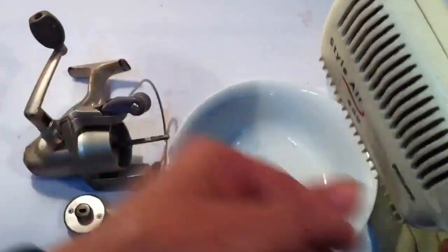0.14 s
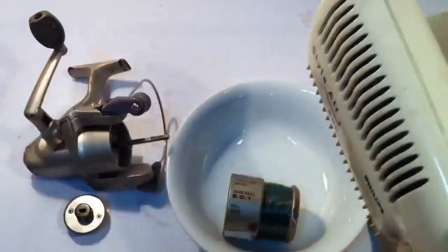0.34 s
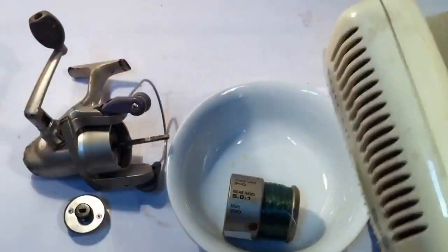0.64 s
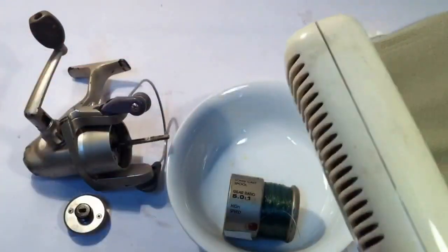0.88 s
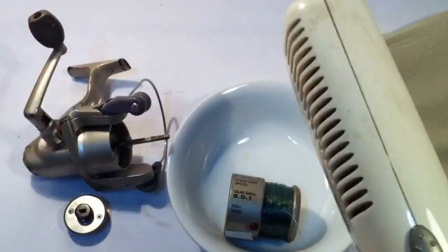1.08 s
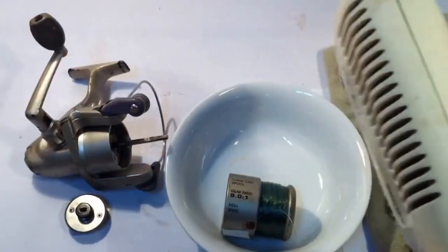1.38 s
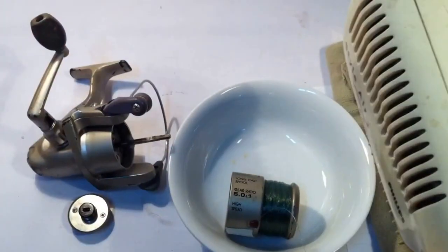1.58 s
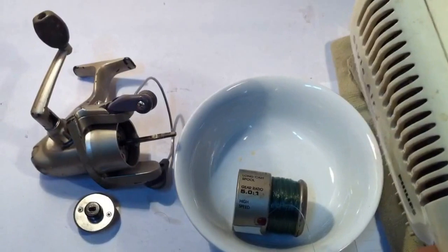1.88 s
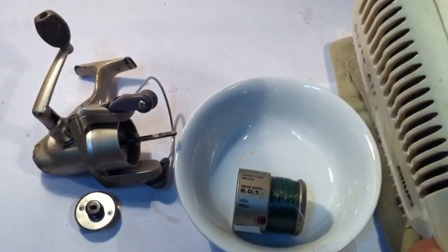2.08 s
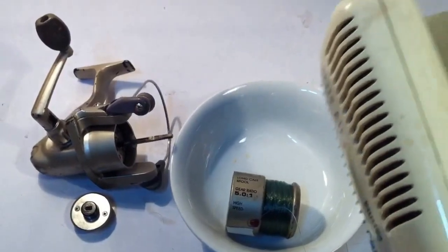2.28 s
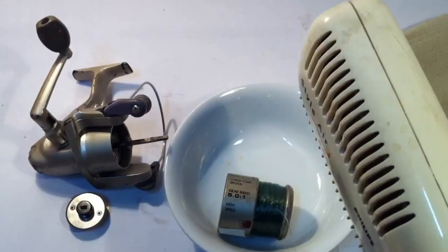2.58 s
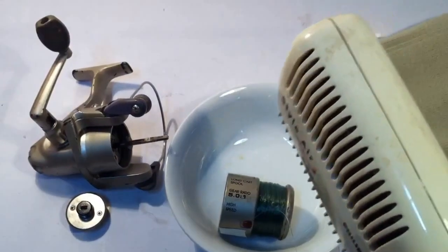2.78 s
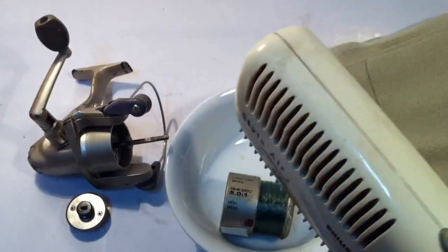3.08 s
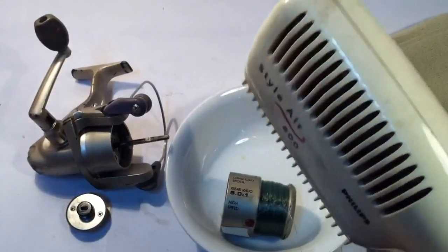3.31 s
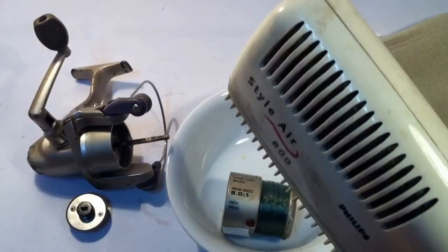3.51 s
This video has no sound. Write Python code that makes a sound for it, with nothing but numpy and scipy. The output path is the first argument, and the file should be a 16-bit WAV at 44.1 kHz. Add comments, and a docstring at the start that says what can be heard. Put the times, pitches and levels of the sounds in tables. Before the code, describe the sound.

A handheld hair dryer clicks on and spins up to a rushing, whining blast after handling clunks

```python
"""In a small room, a hand-held hair dryer is picked up over a table, close to the microphone.
Over faint hiss and a low drone its plastic case ticks, rubs and gives one loud clunk: noise snaps plus dying sines.
The switch clicks and the motor spins up: brush hiss, shaft hum and blade whine (sines) and rushing air
(shaped noise through resonances) all follow its speed, while the dryer is turned and brought nearer."""
import sys
import numpy as np
from scipy import signal
from scipy.fft import rfft, irfft
from scipy.io import wavfile

SR = 44100
rng = np.random.default_rng(int(sys.argv[2]) if len(sys.argv) > 2 else 0)


def dump(signal):
    """Clip the signal to [-1, 1] and save it as 16-bit WAV at the path in sys.argv[1]."""
    limited = np.clip(np.atleast_2d(signal).T, -1, 1)
    pcm = np.round(limited * 32767).astype(np.int16)
    wavfile.write(sys.argv[1], SR, pcm)


N = 160965

# Colour of the background hiss. Each row: frequency in Hz, relative level in dB per Hz.
FLOOR_COLOUR = [(18, -69), (30, -47), (85, -33), (97, -18), (152, -8), (342, -21), (422, -18.5), (507, -23),
                (694, -25), (950, -24.5), (1110, -25.5), (1300, -27), (1880, -28), (15600, -33.5)]
FLOOR_DB = -63.5
# Swells of the low drone. Each row: time in seconds, rms level in dB.
DRONE_LEVEL = [(.06, -59.5), (.18, -79), (.33, -68), (.41, -71), (.5, -57.5), (.65, -70), (.85, -62.5),
               (1.15, -70), (1.3, -69), (1.39, -58), (1.7, -67), (1.87, -61), (2.0, -69)]
DRONE_HZ, DRONE_WANDER = 144.6, 0.0847  # wander: rms share of the pitch

# Decay of the room. Each row: frequency in Hz, t60 in seconds.
ROOM_DECAY = [(150, 0.35), (600, 0.43), (2000, 0.49), (6000, 0.53), (14000, 0.27)]
# Colour of the room's answer. Each row: frequency in Hz, level in dB.
ROOM_COLOUR = [(150, 3), (400, 1), (1200, -1.5), (3500, 2), (8000, 3), (15000, -6.5)]
ROOM_DELAY_S = .014
TICK_ROOM_DB, CLUNK_ROOM_DB, THUMP_ROOM_DB, TONE_ROOM_DB = -10.5, -11.5, -16, -15

# Ticks of the case, the last two from the switch. Each row: start in seconds, gain in dB, extra treble in dB.
TICKS = [(.224, -7.5, -25), (.578, -13.5, 3), (.606, -14, 3.5), (.676, -18, 12.5), (.734, -14.5, 4),
         (.797, -7.5, -4.5), (.875, -19, 3), (.9165, 3.5, -3), (.921, -1, -4), (.939, -9, -8),
         (.951, -2, -8), (.963, -15, -3), (1.064, -9, -1.5), (1.953, -7.5, -2), (1.958, -10.5, -4)]
# What the case rings with. Each row: frequency in Hz, level in dB before the tick's gain, t60 in seconds.
CASE_MODES = [(739, -50.5, 0.082), (820, -58, .05), (1570, -55, .036), (1775, -52, 0.042),
              (2110, -69, .034), (3040, -50, .03)]
# Colour of a tick's snap. Each row: frequency in Hz, relative level in dB per Hz.
SNAP_COLOUR = [(200, -12.5), (1000, -5), (2000, 1.5), (6000, -0.5), (10000, -10), (15000, -12)]
SNAP_DB, SNAP_T60_S = -42, .018
KNOCK_TREBLE_HZ = 1170  # the extra treble of ticks and clunk lies above this

# The hand sliding on the case. Each row: start in seconds, length in seconds, gain in dB at the peak.
RUBS = [(0.549, 0.66, -73), (0.721, 0.36, -73), (.915, 0.074, -66), (1.079, 0.21, -67)]
# Colour of the rubbing. Each row: frequency in Hz, relative level in dB per Hz.
RUB_COLOUR = [(150, -4), (400, 2), (1000, -2), (2500, 0.5), (5000, -6.5), (15000, -9)]
# Resonances the rubbing wakes. Each row: frequency in Hz, width in Hz, gain in dB.
RUB_RINGS = [(413, 52, 5.2), (687, 31, 5.6), (1250, 90, 3.2), (1770, 110, 7), (3100, 140, 3)]
RUB_FLUTTER_DB = 2.4

# Soft knocks of the hand on the handle. Each row: start in seconds, level in dB, extra treble in dB,
# t60 in seconds.
BUMPS = [(.785, -57.5, 2, 0.26), (1.786, -54, -1, 0.16), (1.85, -64, 6, .15), (1.905, -55.5, 6, 0.18),
         (1.995, -63, 11, .12), (2.024, -65, 14, .12), (2.112, -48.5, 10, 0.12), (2.165, -41, 10, .1),
         (2.2, -34, 0, .08)]
# Colour of the soft knocks. Each row: frequency in Hz, relative level in dB per Hz.
BUMP_COLOUR = [(60, -13), (170, 2), (300, -0.5), (700, -15.5), (1200, -14), (3000, -42), (12000, -50.5)]
BUMP_RISE_S, BUMP_TREBLE_HZ = 0.0062, 600

# Blows of the clunk and the clatter after it. Each row: start in seconds, gain in dB, extra treble in dB.
CLUNK_BLOWS = [(1.4705, -27, 4), (1.4738, -3, -2), (1.475, -3, -1.5), (1.477, -2, 0.5), (1.4803, -4, -4),
               (1.4854, -10, -6), (1.4963, -11.5, -2), (1.510, -17, -4), (1.521, -19, -3),
               (1.5252, -14, -14), (1.540, -17.5, -10), (1.554, -24, -16), (1.567, -32, 8),
               (1.572, -29.5, 10.5)]
# What the clunk rings with. Each row: frequency in Hz, level in dB before the blow's gain, t60 in seconds.
CLUNK_MODES = [(574, -37, .04), (1150, -37, 0.025), (2220, -46, 0.027), (3700, -52, .018)]
# Colour of each blow's crack. Each row: frequency in Hz, relative level in dB per Hz.
CRACK_COLOUR = [(100, -13), (280, 2.5), (480, -2), (620, -1), (800, -7.5), (1120, -1), (1400, -13.5),
                (2200, -9), (2600, -16.5), (3700, -18), (5500, -27), (8500, -27), (15000, -40)]
CRACK_DB, CRACK_T60_S = -19.5, .028
# Low rings of the hollow body. Each row: frequency in Hz, level in dB, t60 in seconds.
THUMP_MODES = [(175, -15.5, 0.069), (251, -18.5, 0.043), (312, -23.5, 0.033), (402, -30, 0.041)]
THUMP_S = 1.4772

# Motor and fan; the stall speed is a share of full speed.
START_S, SPIN_UP_S, TOP_REV_PER_S = 1.98, .188, 185.85
SPEED_WAVER = .0007  # rms share of the speed
STALL_SHARE, STALL_SOFTNESS = 0.29, 0.033

# Hiss of the motor's brushes. Each row: frequency in Hz, relative level in dB per Hz.
BRUSH_COLOUR = [(200, -22), (700, 6), (1500, 2), (3000, -1), (6000, 3), (10000, 2), (15000, -8)]
BRUSH_DB, BRUSH_GROWTH, BRUSH_FLUTTER_DB = -54.5, 0.56, 1.5  # growth: exponent on speed
DUCT_HZ, DUCT_WIDTH_HZ = 720, 45
BRUSH_DUCT_DB, DUCT_AIR_DB = 17, -14

# Tones of the shaft. Each entry: multiple of the shaft speed, base level in dB.
SHAFT_TONES = {1: -48.5, 2: -54, 4: -59.5, 5: -57, 6: -63, 7: -66, 13: -52.5}
# Swells of the duct's ringing with the shaft hum. Each row: time in seconds, gain in dB.
DUCT_SONG = [(2.21, 6), (2.27, 23), (2.34, 9), (2.46, 9), (2.53, 20), (2.61, 14), (2.72, 18), (3.0, 17.5),
             (3.26, 16), (3.33, 13), (3.43, 18), (3.65, 16)]
# Tones of the fan blades: base levels in dB of the blade tone and its overtones, in order.
BLADE_TONES_DB = [-36.3, -61, -48]
# Swells and dips of the whine. Each row: time in seconds, gain in dB of the blade tone,
# gain in dB of its overtones.
WHINE = [(2.09, -5, -9), (2.14, -6, -3), (2.19, 0, 1), (2.25, -5, 2), (2.31, 2, 2), (2.39, -8, -7),
         (2.5, 0, 0), (2.62, -3, -5), (2.72, -1, 3), (2.84, 0, 3), (2.91, -4, -6), (3.05, -3, -4),
         (3.12, 1, -1), (3.2, 0, 3), (3.38, -.5, -1), (3.5, 4, 1), (3.65, 0, -5)]
BLADES, BLADE_ROUGH_RAD = 20, 0.2
TONE_GROWTH, BLADE_GROWTH = 1.6, 1.4  # exponents on the air flow
TONE_FLUTTER_DB, BLADE_FLUTTER_DB = 1.5, 1.9

# Rush of air at full speed. Each row: frequency in Hz, relative level in dB per Hz.
AIR_COLOUR = [(18, -48), (30, -37), (85, -40), (148, -17), (178, -9.5), (219, -8.5), (316, -8.5), (370, -7),
              (469, -16), (507, -10.5), (676, -5), (731, -4.5), (791, -5), (1030, -8.5), (1200, -7.5),
              (1300, -7.5), (1780, -5.5), (1980, -8.5), (2500, -5.5), (3420, -5), (3700, -5.5),
              (4010, -6.5), (9020, -9.5), (13700, -15.5), (15600, -19)]
AIR_DB, AIR_FLUTTER_DB, STALL_FLUTTER_DB = -28.5, .5, 3
# How steeply the rush grows with the flow. Each row: frequency in Hz, exponent on the flow.
AIR_GROWTH = [(150, 1.8), (700, 1.25), (2000, 1.45), (5000, 1.88), (14000, 2.85)]
# The dryer is turned and brought nearer. Each row: time in seconds, gain in dB, extra treble in dB.
AIM = [(2.1, -1, -1), (2.3, -1, -1), (2.42, -1.5, 0.5), (2.75, 0, -2), (3.0, -0.15, -1), (3.3, -0.5, 0),
       (3.55, 0.5, -1), (3.65, -0.5, 1)]
AIM_TREBLE_HZ = 4000
# Resonances of the case that colour the rush. Each row: frequency in Hz, width in Hz, gain in dB.
CAVITIES = [(1225, 35, -1.5), (1378, 41, 0), (1597, 46, -9), (1790, 81, -4), (2082, 50, -8),
            (2530, 130, -5), (3105, 60, -7.5), (6070, 380, -12), (9030, 300, -10)]
CAVITY_WANDER, CAVITY_FLUTTER_DB = .012, 3.5  # wander: rms share of the frequency

BASS_CUT_HZ, BASS_LEAK_DB = 158, -27
CUTOFF_HZ = 15780


def amp(db):
    """Decibels to gain."""
    return 10 ** (np.asarray(db) / 20)


def unit(x):
    """Scales to rms 1."""
    return x / np.sqrt(np.mean(x ** 2) + 1e-20)


def at_hz(points, hz):
    """Reads a table on a log-frequency axis."""
    f, value = np.transpose(points)
    return np.interp(np.log(hz + 1), np.log(f + 1), value)


def at_time(points, t, axis=1):
    """Reads one column of a curve over time."""
    rows = np.array(points)
    return np.interp(t, rows[:, 0], rows[:, axis])


def add(mix, s, sound):
    """Mixes a sound in at time s."""
    part = mix[round(s * SR):][:len(sound)]
    part += sound[:len(part)]


def noise(colour, size):
    """Noise of a given colour, random in phase, rms 1."""
    hz = np.fft.rfftfreq(size, 1 / SR)
    phase = 2 * np.pi * rng.random(len(hz))
    return unit(irfft(amp(at_hz(colour, hz)) * np.exp(1j * phase), size))


def drift(rate_hz):
    """Random motion that weakens above a rate, rms 1."""
    hz = np.fft.rfftfreq(N, 1 / SR)
    spectrum = rfft(rng.standard_normal(N)) * (hz > 0)
    return unit(irfft(spectrum / (1 + (hz / rate_hz) ** 2), N))


def resonate(x, hz, width_hz):
    """A resonance of gain 1 whose centre may move: shift it to zero, smooth, shift back."""
    turn = np.exp(2j * np.pi * np.cumsum(hz * np.ones(len(x))) / SR)
    r = np.exp(-np.pi * width_hz / SR)
    smooth = signal.lfilter([1 - r], [1, -r], x / turn + 1e-18)
    return 2 * (turn * smooth).real


def ring(modes, t):
    """Dying sines of a struck object."""
    return sum(amp(db - 60 * t / t60) * np.sin(2 * np.pi * hz * t) for hz, db, t60 in modes)


def brighten(x, treble_db, edge_hz):
    """Raises or lowers everything above an edge."""
    low = signal.lfilter(*signal.butter(3, edge_hz, "low", fs=SR), x)
    high = signal.lfilter(*signal.butter(3, edge_hz, "high", fs=SR), x)
    return low + amp(treble_db) * high


def in_room(x, wet_db):
    """Adds a diffuse tail whose bands die at their own speeds."""
    hz, t, z = signal.stft(rng.standard_normal(SR * 3 // 4), SR, nperseg=256)
    hz = hz[:, None]
    level_db = at_hz(ROOM_COLOUR, hz) - 60 * t / at_hz(ROOM_DECAY, hz)
    tail = signal.istft(z * amp(level_db), SR, nperseg=256)[1]
    tail = np.pad(tail / np.linalg.norm(tail), (round(ROOM_DELAY_S * SR), 0))
    return x + amp(wet_db) * signal.fftconvolve(x, tail)[:N]


def background():
    """Faint steady hiss and a low sine drone that wavers in pitch and level."""
    angle = 2 * np.pi * np.cumsum(DRONE_HZ * (1 + DRONE_WANDER * drift(24.9))) / SR
    drone = np.sqrt(2) * np.sin(angle) * amp(at_time(DRONE_LEVEL, np.arange(N) / SR))
    return amp(FLOOR_DB) * noise(FLOOR_COLOUR, N) + drone


def ticks():
    """Case and switch ticks: a short noise snap sets the plastic ringing."""
    out, t = np.zeros(N), np.arange(SR // 5) / SR
    for s, db, treble_db in TICKS:
        snap = noise(SNAP_COLOUR, len(t)) * amp(SNAP_DB - 60 * t / SNAP_T60_S)
        add(out, s, amp(db) * brighten(snap + ring(CASE_MODES, t), treble_db, KNOCK_TREBLE_HZ))
    return out


def rubs():
    """The sliding hand: fluttering noise wakes resonances as its pressure rises and falls."""
    scrape = noise(RUB_COLOUR, N) * amp(RUB_FLUTTER_DB * drift(60))
    scrape = scrape + sum(amp(db) * resonate(scrape, hz, width) for hz, width, db in RUB_RINGS)
    pressure = np.zeros(N)
    for s, length, db in RUBS:
        add(pressure, s, amp(db) * np.hanning(round(length * SR)))
    return pressure * scrape


def bumps():
    """The hand knocks the handle softly: dull noise with a rounded onset dies away."""
    out, t = np.zeros(N), np.arange(SR // 5) / SR
    for s, db, treble_db, t60 in BUMPS:
        onset = np.minimum(t / BUMP_RISE_S, 1)
        knock = noise(BUMP_COLOUR, len(t)) * onset * amp(db - 60 * t / t60)
        add(out, s, brighten(knock, treble_db, BUMP_TREBLE_HZ))
    return out


def handling():
    """The plastic case ticks, rubs and bumps in the hand, answered by the room."""
    return in_room(ticks() + rubs() + bumps(), TICK_ROOM_DB)


def clunk():
    """Quick hard blows, each a crack and a short ring, over one low thump; then it clatters to rest."""
    blows, t = np.zeros(N), np.arange(SR // 4) / SR
    for s, db, treble_db in CLUNK_BLOWS:
        crack = noise(CRACK_COLOUR, len(t)) * amp(CRACK_DB - 60 * t / CRACK_T60_S)
        add(blows, s, amp(db) * brighten(crack + ring(CLUNK_MODES, t), treble_db, KNOCK_TREBLE_HZ))
    thump = np.zeros(N)
    add(thump, THUMP_S, ring(THUMP_MODES, t))
    return in_room(blows, CLUNK_ROOM_DB) + in_room(thump, THUMP_ROOM_DB)


def speed(t):
    """Share of full speed: the motor closes in on it exponentially."""
    return 1 - np.exp(-np.maximum(t - START_S, 1e-6) / SPIN_UP_S)


def flow(t):
    """Share of the full air flow: it sets in softly once the fan is past its stall speed."""
    past_stall = (speed(t) - STALL_SHARE) / STALL_SOFTNESS
    return STALL_SOFTNESS * np.logaddexp(0, past_stall) / (1 - STALL_SHARE)


def brushes():
    """The brushes scrape and ring the duct as soon as the shaft turns, before the air gets going."""
    scrape = noise(BRUSH_COLOUR, N) * amp(BRUSH_DB + BRUSH_FLUTTER_DB * drift(80))
    scrape = scrape * speed(np.arange(N) / SR) ** BRUSH_GROWTH
    return scrape + amp(BRUSH_DUCT_DB) * resonate(scrape, DUCT_HZ, DUCT_WIDTH_HZ)


def rotor():
    """Shaft tones flare as they sweep through the duct resonance; the blades whine above them."""
    t = np.arange(N) / SR
    rev_per_s = TOP_REV_PER_S * speed(t) * (1 + SPEED_WAVER * drift(7.7))
    angle = 2 * np.pi * np.cumsum(rev_per_s) / SR
    hum = np.zeros(N)
    for k, db in SHAFT_TONES.items():
        phase = 2 * np.pi * rng.random()
        hum += amp(db + TONE_FLUTTER_DB * drift(29)) * np.sin(k * angle + phase)
    hum = hum + amp(at_time(DUCT_SONG, t)) * resonate(hum, DUCT_HZ, DUCT_WIDTH_HZ)
    whine = np.zeros(N)
    for k, db in enumerate(BLADE_TONES_DB, 1):
        level_db = db + at_time(WHINE, t, axis=min(k, 2)) + BLADE_FLUTTER_DB * drift(8.6)
        whine += amp(level_db) * np.sin(k * BLADES * angle + BLADE_ROUGH_RAD * drift(64))
    tones = hum * flow(t) ** TONE_GROWTH + whine * flow(t) ** BLADE_GROWTH
    return in_room(np.sqrt(2) * tones, TONE_ROOM_DB)


def air():
    """Turbulence in the grille swells and brightens with the flow and excites the case and duct."""
    hz, t, z = signal.stft(noise(AIR_COLOUR, N), SR, nperseg=512, noverlap=384)
    hz = hz[:, None]
    treble = hz ** 2 / (hz ** 2 + AIM_TREBLE_HZ ** 2)
    aim_db = at_time(AIM, t) + treble * at_time(AIM, t, axis=2)
    z = z * flow(t) ** at_hz(AIR_GROWTH, hz) * amp(aim_db)
    rush = signal.istft(z, SR, nperseg=512, noverlap=384)[1][:N]
    rush = rush * amp(AIR_DB + AIR_FLUTTER_DB * drift(28))
    # a slow fan sputters
    rush = rush * amp(STALL_FLUTTER_DB * (1 - flow(np.arange(N) / SR)) * drift(55))
    cavities = np.zeros(N)
    for hz, width, db in CAVITIES:
        centre = hz * (1 + CAVITY_WANDER * drift(2.2))
        cavities += amp(db + CAVITY_FLUTTER_DB * drift(8)) * resonate(rush, centre, width)
    rush = rush + cavities
    return rush + amp(DUCT_AIR_DB) * resonate(rush, DUCT_HZ, DUCT_WIDTH_HZ) / 2


def bass_cut(x):
    """The microphone's steep bass cut on the close sounds; a faint full-range leak remains."""
    high_pass = signal.butter(5, BASS_CUT_HZ, "high", fs=SR, output="sos")
    return signal.sosfilt(high_pass, x) + amp(BASS_LEAK_DB) * x


def scene():
    """Everything is heard from one point, alike in both ears."""
    dryer = bass_cut(handling() + clunk() + brushes() + rotor()) + air()
    mid = background() + dryer
    return np.array([mid, mid])


def record(dry):
    """The recorder's band limit: a steep low-pass takes off the extreme treble."""
    low_pass = signal.firwin(1201, CUTOFF_HZ, window=("kaiser", 9), fs=SR)
    return signal.oaconvolve(dry, low_pass[None], "same")


dry = scene()
out = record(dry)
dump(out)
```